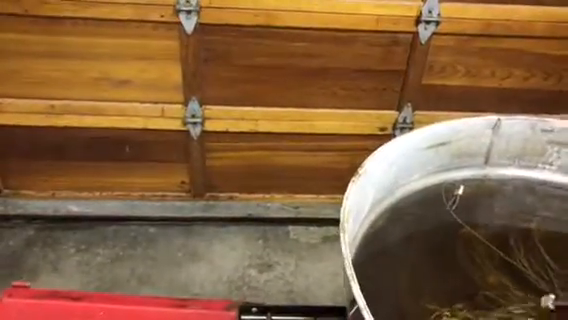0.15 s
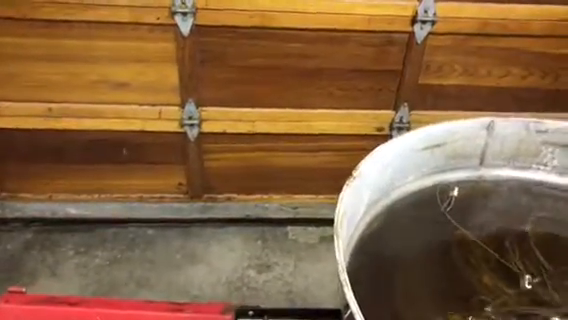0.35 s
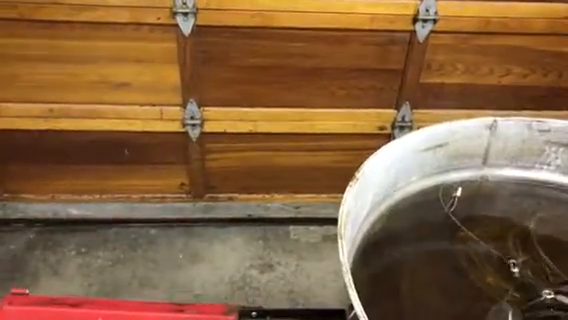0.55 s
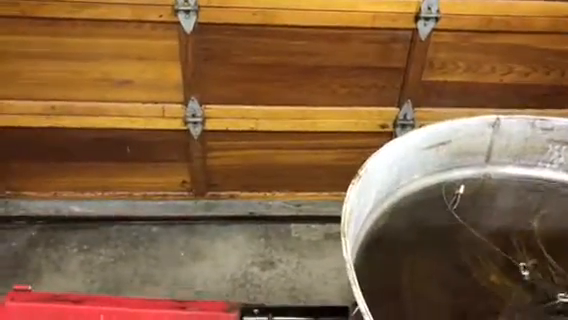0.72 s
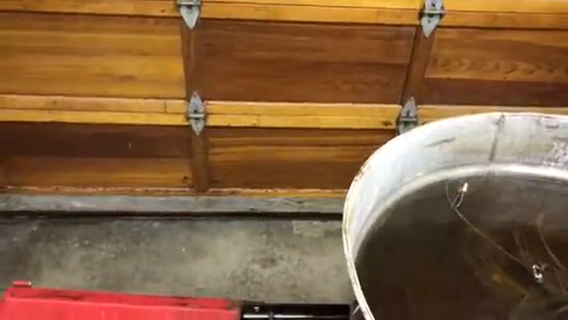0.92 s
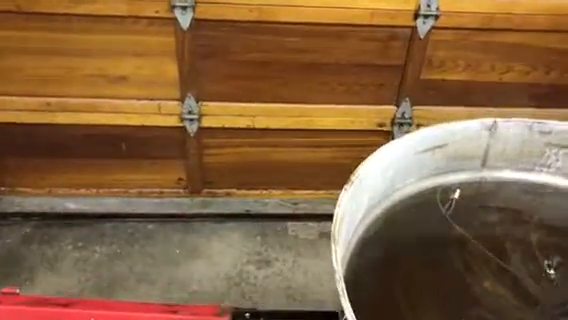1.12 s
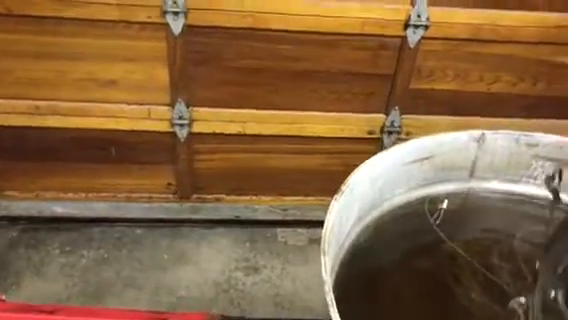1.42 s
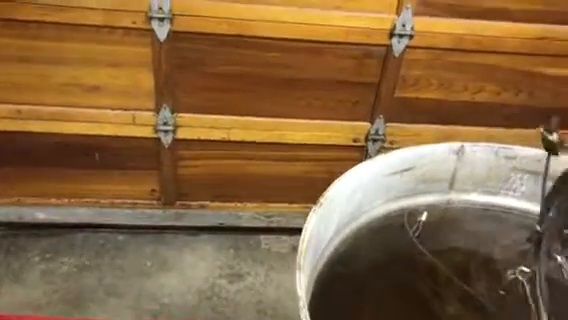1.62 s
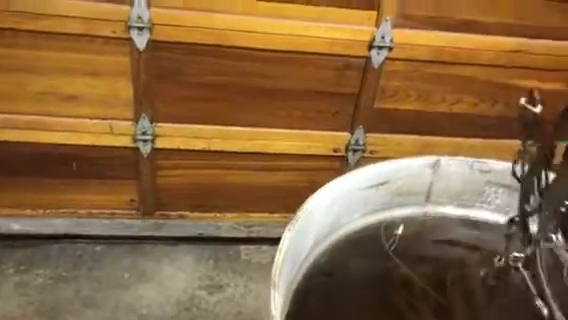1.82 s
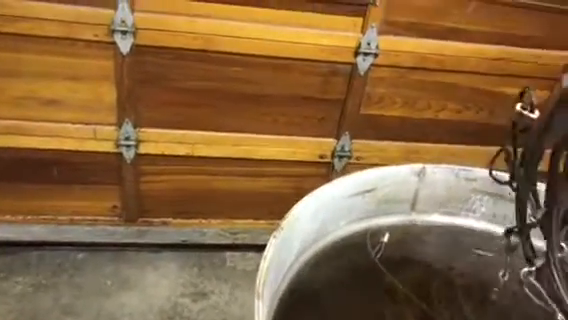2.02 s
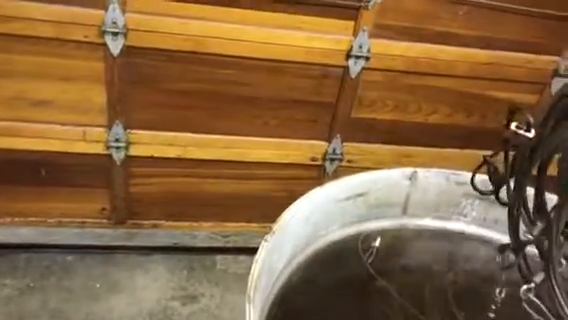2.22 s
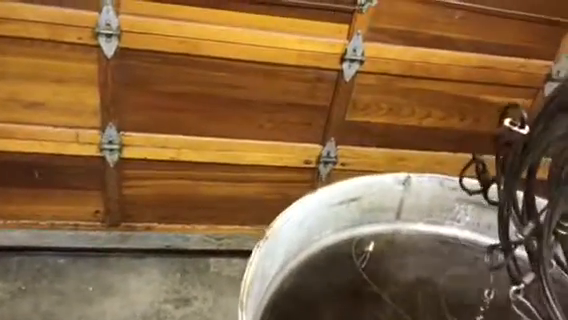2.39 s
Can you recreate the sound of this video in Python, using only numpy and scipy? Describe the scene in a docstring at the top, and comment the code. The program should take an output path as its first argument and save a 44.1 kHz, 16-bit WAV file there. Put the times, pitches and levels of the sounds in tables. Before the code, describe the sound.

Water runs off a lifted cable bundle into a metal tub of water, heard close in a garage. Quiet slosh and fine droplets open; splashes burst near 0.3, 0.4 and 0.55 s, with ringing bubble plops, fading by 0.85. A softer, lower gurgling trickle runs 1.0-1.4 s with a brief thin hiss. After a near lull, crisp irregular drips and plinks patter from 1.5 to 2.5 s over faint hum.

```python
"""A bundle of cable is drawn out of a metal tub of water in a garage. From the start: room tone, faint hum, low
slosh and fine droplets, all from shaped noise or random impulses. Water pours off in two surges, up to 0.9 s
and from 1.0 s, made of dense splashes, bubbles and tub ringing. From 0.2 s single drops tick; loud bubbles gulp
within the surges and drops trap smaller ringing ones; a thin jet hisses in the second surge. After the surges
the drops carry on. Tub echoes and a short garage tail surround the water."""
import sys
import numpy as np
from scipy import signal
from scipy.fft import rfft, irfft, next_fast_len
from scipy.io import wavfile

SR = 44100
rng = np.random.default_rng(int(sys.argv[2]) if len(sys.argv) > 2 else 0)


def file_out(sig):
    """Save sig as 16-bit WAV at sys.argv[1]."""
    # one column per channel
    cols = np.atleast_2d(sig).T
    # limit, then scale
    lim = np.clip(cols, -1, 1)
    pcm = np.round(lim * 32767).astype(np.int16)
    wavfile.write(sys.argv[1], SR, pcm)


N = 112454
TIME_S = np.arange(N) / SR
EDGE_HZ = 16050


def amp(db):
    """Decibels to gain."""
    return 10 ** (np.asarray(db) / 20)


def unit(x):
    """Scales to rms 1."""
    return x / np.sqrt(np.mean(x ** 2) + 1e-20)


def read(points, hz):
    """Reads a table on a log-frequency axis."""
    f, value = np.transpose(points)
    return np.interp(np.log(hz + 1), np.log(f + 1), value)


def envelope(points):
    """Gain over time from a (time_s, level_db) table."""
    return amp(np.interp(TIME_S, *np.transpose(points)))


def add(mix, start_s, sound):
    """Mixes a sound in at start_s."""
    part = mix[max(round(start_s * SR), 0):][:len(sound)]
    part += sound[:len(part)]


def shaped(x, gain):
    """Filters by a function of frequency."""
    size = next_fast_len(N + SR // 2)
    return irfft(rfft(x, size) * gain(np.fft.rfftfreq(size, 1 / SR)), size)[:N]


def low_part(x, top_hz, order):
    """Rolls off above top_hz without phase shift."""
    return shaped(x, lambda f: 1 / (1 + (f / top_hz) ** order))


def ring(x, hz, width_hz):
    """One resonance of gain 1 at its centre."""
    r = np.exp(-np.pi * width_hz / SR)
    pole = r * np.exp(2j * np.pi * hz / SR)
    return 2 * signal.lfilter([1 - r], [1, -pole], x).real


def impacts(per_s, spread_db):
    """A random train of impulses of unequal size and random sign."""
    size_db = spread_db * np.minimum(rng.exponential(1, N), 4)
    size = amp(size_db) * rng.choice([-1, 1], N)
    return size * (rng.random(N) < per_s / SR)


BUBBLE_ATTACK_S = 0.0001
# Most of the swing dies fast, the rest rings on; lengths are multiples of the bubble's life
FAST_LIFE, SLOW_LIFE, SLOW_SHARE = 0.62, 1.6, 0.3


def bubble(hz, life_cycles, rise_per_life):
    """A dying sine whose pitch climbs as the bubble nears the surface."""
    life_s = life_cycles / hz
    t = np.arange(0, 9 * life_s, 1 / SR)
    lives = t / life_s
    fast = (1 - SLOW_SHARE) * np.exp(-lives / FAST_LIFE)
    slow = SLOW_SHARE * np.exp(-lives / SLOW_LIFE)
    tone = np.sin(2 * np.pi * hz * t * (1 + rise_per_life * lives / 2))
    return tone * (fast + slow) * (1 - np.exp(-t / BUBBLE_ATTACK_S))


SMALL_BUBBLE_RISE_PER_LIFE = 0.043


def bubble_cloud(per_s, spread_db, low_hz, high_hz, life_cycles, tilt, count=24):
    """Small bubbles of many sizes, born at random; tilt favours the high ones."""
    cloud = np.zeros(N)
    for hz in np.geomspace(low_hz, high_hz, count):
        births = impacts(per_s / count, spread_db)
        voice = bubble(hz, life_cycles, SMALL_BUBBLE_RISE_PER_LIFE)
        cloud += signal.oaconvolve(births, voice)[:N] * (hz / low_hz) ** tilt
    return unit(cloud)


# Tub resonances before the send gain: pitch_hz, width_hz, gain_db
TUB_MODES = [(1030, 13, -37.5), (1192, 30, -12.5), (1410, 93, -2.5), (1529, 85, -2.5), (1671, 15, -0.5),
             (2266, 20, -15), (2835, 17, -22.5), (2793, 78, -3.5), (3450, 21, -9), (3563, 270, -6)]
TUB_IN_SURGE_DB, TUB_IN_DRIPS_DB = 8.5, -14


def tub(x):
    """The metal tub rings at its resonances."""
    return sum(amp(gain_db) * ring(x, hz, width_hz) for hz, width_hz, gain_db in TUB_MODES)


GRAINS_PER_S, GRAIN_SPREAD_DB = 7000, 1.5
BURBLES_PER_S, BURBLE_SPREAD_DB, BURBLE_DB = 1200, 3.5, -7.5
BURBLE_LOW_HZ, BURBLE_HIGH_HZ, BURBLE_CYCLES, BURBLE_TILT = 798.6, 6000, 6, 0.7
CHURN_TOP_HZ, SPRAY_FROM_HZ = 1944, 4100
CHURN_TRIM_DB, FINE_TRIM_DB, SPRAY_TRIM_DB = -4, 0, -5.5
SURGE_FADE_S = 0.05


def surge(levels, colour):
    """Tiny splashes, bubbles and tub knocks, split into three bands that swell independently."""
    start_to_end_s, *curves_db = np.transpose(levels)
    splashes = unit(impacts(GRAINS_PER_S, GRAIN_SPREAD_DB))
    knocks = unit(impacts(GRAINS_PER_S, GRAIN_SPREAD_DB))
    burble = amp(BURBLE_DB) * bubble_cloud(
        BURBLES_PER_S, BURBLE_SPREAD_DB, BURBLE_LOW_HZ, BURBLE_HIGH_HZ, BURBLE_CYCLES, BURBLE_TILT)
    raw = splashes + burble + amp(TUB_IN_SURGE_DB) * tub(knocks)
    water = shaped(raw, lambda f: amp(read(colour, f)))

    churn = low_part(water, CHURN_TOP_HZ, 10)
    body = low_part(water, SPRAY_FROM_HZ, 10)
    bands = (churn, body - churn, water - body)
    trims_db = (CHURN_TRIM_DB, FINE_TRIM_DB, SPRAY_TRIM_DB)
    pour = np.zeros(N)
    for band, curve_db, trim_db in zip(bands, curves_db, trims_db):
        pour += unit(band) * amp(np.interp(TIME_S, start_to_end_s, curve_db) + trim_db)

    before_s, after_s = start_to_end_s[0] - TIME_S, TIME_S - start_to_end_s[-1]
    outside_s = np.maximum(np.maximum(before_s, after_s), 0)
    return pour * np.exp(-outside_s / SURGE_FADE_S)


# Levels before trim: time_s, churn_db, fine_bubbles_db, spray_db
FIRST_SURGE_LEVELS = [(0.0, -54.5, -55, -60), (0.016, -58, -58, -86), (0.026, -60.5, -68, -67),
                      (0.09, -57.5, -55.5, -57), (0.128, -61.5, -62, -71), (0.214, -54, -55.5, -54),
                      (0.276, -41, -36.5, -36.5), (0.308, -46, -43, -44), (0.372, -49, -46, -47),
                      (0.384, -33, -40, -36), (0.428, -47, -45.5, -41.5), (0.528, -46.5, -44, -44.5),
                      (0.566, -40, -38, -35.5), (0.586, -42, -42, -49), (0.67, -55, -59, -59),
                      (0.7, -48, -55.5, -56), (0.852, -77.5, -82, -77), (0.86, -67.5, -91, -71)]
# Relative spectrum: freq_hz, gain_db
FIRST_SURGE_COLOUR = [(130, -30), (200, -28), (300, -11.5), (520, -9.5), (800, -5.5), (1020, 3.5),
                      (1350, 2.5), (1650, -1), (2000, -5.5), (2750, -6), (4770, -18), (6170, -16.5),
                      (10500, -23), (15100, -23.5), (16000, -36)]


def first_surge():
    """Water runs off the cable from the start."""
    return surge(FIRST_SURGE_LEVELS, FIRST_SURGE_COLOUR)


DROPLETS_PER_S, DROPLET_SPREAD_DB = 1000, 3
DROPLET_LOW_HZ, DROPLET_HIGH_HZ, DROPLET_CYCLES, DROPLET_TILT = 1524, 8970, 2.1, 0.33
# Level before the drip low cut: time_s, level_db
DRIZZLE_LEVELS = [(0, -68.5), (.65, -58.5), (.92, -71), (1.4, -71), (1.52, -62.5), (1.68, -67),
                  (1.9, -71.5), (2.2, -67.5), (2.45, -63), (2.55, -73)]


def drizzle():
    """Fine droplets patter as a cloud of short-lived bubbles."""
    cloud = bubble_cloud(
        DROPLETS_PER_S, DROPLET_SPREAD_DB, DROPLET_LOW_HZ, DROPLET_HIGH_HZ, DROPLET_CYCLES, DROPLET_TILT)
    return cloud * envelope(DRIZZLE_LEVELS)


SPATTERS_PER_S, SPATTER_SPREAD_DB, SPATTER_FROM_HZ = 110, 3.6, 7000
# Level before the drip low cut: time_s, level_db
SPATTER_LEVELS = [(0, -66.5), (.8, -74), (.95, -72), (1.401, -79), (1.6, -79), (1.9, -71.5), (2.2, -65.5),
                  (2.55, -71)]


def spatter():
    """Very fine, sharp ticks on the surface: sparse high-passed impulses."""
    hits = impacts(SPATTERS_PER_S, SPATTER_SPREAD_DB)
    ticks = shaped(hits, lambda f: f ** 2 / (f ** 2 + SPATTER_FROM_HZ ** 2))
    return unit(ticks) * envelope(SPATTER_LEVELS)


SLOSH_HZ, SLOSH_WIDTH_HZ = 276, 300
# Low wash: time_s, level_db
SLOSH_LEVELS = [(0, -66.5), (.25, -70), (.55, -62.5), (.85, -67), (1.0, -72.5), (1.35, -84), (1.55, -84),
                (1.8, -66.5), (1.95, -78), (2.55, -74.5)]


def slosh():
    """Water left in the tub sloshes: noise through two broad low resonances."""
    wash = ring(rng.standard_normal(N), SLOSH_HZ, 2 * SLOSH_WIDTH_HZ)
    wash = ring(wash, SLOSH_HZ, SLOSH_WIDTH_HZ)
    return unit(wash) * envelope(SLOSH_LEVELS)


AIR_DB = -65.5
# Relative air spectrum: freq_hz, gain_db
AIR_COLOUR = [(20, -10), (45, 11), (110, 8.5), (200, 0.5), (400, -2.5), (650, -5), (1000, -2.5),
              (1600, -15.5), (2800, -8), (5000, -13.5), (8000, -38), (10500, -18), (13000, -12.5),
              (16000, -12)]


def room_air():
    """Steady noise with a low rumble."""
    air = shaped(rng.standard_normal(N), lambda f: amp(read(AIR_COLOUR, f)))
    return amp(AIR_DB) * unit(air)


# Hum bands, each filtered twice: pitch_hz, width_per_pass_hz, level_db
HUM_BANDS = [(52.6, 5.4, -79.5), (97.5, 10.2, -77.5)]


def hum():
    """Faint hum: noise through narrow low resonances."""
    out = np.zeros(N)
    for hz, width_hz, level_db in HUM_BANDS:
        once = ring(rng.standard_normal(N), hz, width_hz)
        out += amp(level_db) * unit(ring(once, hz, width_hz))
    return out


TICK_DECAY_S, TICK_OCTAVES = 0.00074, 0.55


def tick(peak_db, hz):
    """A drop hits the surface: a sharp minimum-phase pulse with a little spatter."""
    t, f = np.arange(512) / SR, np.fft.rfftfreq(512, 1 / SR)
    blow = 0.14 * rng.standard_normal(len(t)) * np.exp(-t / TICK_DECAY_S)
    blow[0] = 1
    octaves_off = np.log2((f + 100) / hz)
    log_gain = -2 * np.log(1 + (octaves_off / TICK_OCTAVES / 2) ** 2)
    circle = np.concatenate([log_gain, log_gain[-2:0:-1]])
    # Hilbert transform of log gain gives the minimum phase
    response = np.exp(np.conj(signal.hilbert(circle)))[:len(f)]
    pulse = irfft(rfft(blow) * response)
    return amp(peak_db) * pulse / abs(pulse).max()


# Drops striking water, before the drip low cut: start_s, peak_db, centre_hz
DROP_TICKS = [(0.1798, -37, 4520), (0.3822, -25, 7000), (.5615, -28, 5000), (0.688, -37, 7500),
              (.7250, -30.5, 13700), (0.8577, -43.5, 6750), (0.8784, -42, 4730), (0.9913, -42.5, 6000),
              (1.0135, -35, 8150), (1.1010, -34.5, 12000), (1.2730, -39.5, 6960), (1.3445, -34.5, 4040),
              (1.4718, -53, 5560), (1.518, -52, 4400), (1.5307, -42, 7760), (1.5352, -41.5, 4660),
              (1.6065, -52, 5000), (1.6307, -33.5, 14800), (1.697, -36, 13100), (1.7155, -38, 6540),
              (1.7197, -37.5, 8450), (1.7250, -39, 7500), (1.767, -34, 7000), (1.7683, -31, 7400),
              (1.7742, -33, 5300), (1.806, -31.5, 6200), (1.8105, -45, 7500), (1.8418, -49, 2560),
              (1.9445, -39.5, 14000), (1.956, -48, 5950), (1.9599, -27.5, 6000), (1.959, -30, 14300),
              (2.0093, -41, 6100), (2.0225, -38, 3960), (2.0392, -35.5, 6100), (2.0735, -28, 6940),
              (2.0734, -21, 16100), (2.0752, -54, 6600), (2.1007, -28.5, 12600), (2.1295, -29.5, 3700),
              (2.1895, -41, 14000), (2.2038, -37.5, 5200), (2.2282, -35, 14500), (2.2356, -42, 4200),
              (2.248, -38.5, 3900), (2.2618, -29.5, 4170), (2.3105, -40, 4350), (2.358, -43, 3470),
              (2.4251, -38, 4500), (2.4457, -39, 5000), (2.456, -39, 7100), (2.501, -40, 9800),
              (2.5417, -36, 8500)]


def drop_ticks():
    """Single drops strike the surface."""
    out = np.zeros(N)
    for start_s, peak_db, hz in DROP_TICKS:
        add(out, start_s, tick(peak_db, hz))
    return out


# Ringing bubbles, before the drip low cut: loud gulps within the surges, then air trapped by single drops:
# start_s, level_db, pitch_hz, life_cycles, rise_per_life
RINGING_BUBBLES = [(0.2732, -27.5, 1690, 19, .01), (.3850, -30, 1525, 20, 0.014),
                   (.5620, -33, 2655, 24, 0.0067), (0.5628, -34.5, 1292, 18, 0.011),
                   (1.0265, -43, 1550, 5.7, 0.011), (1.0693, -32, 1640, 3.8, 0.02),
                   (1.255, -36.5, 1650, 18, 0.0078), (1.287, -36, 1547, 6.4, 0.015),
                   (.738, -36.5, 1940, 4.9, 0.033), (0.857, -45, 6740, 8.8, 0.014),
                   (1.3449, -41, 3210, 13, 0.0082), (1.4724, -43.5, 5820, 6.9, .01),
                   (1.5174, -48, 4340, 10, 0.0079), (1.606, -53.5, 3900, 5.8, 0.012),
                   (1.615, -44.5, 3900, 4.3, .01), (1.6459, -47, 3530, 6.8, 0.0083),
                   (1.646, -48, 1850, 7.7, 0.025), (1.6972, -43, 2930, 6, .01),
                   (1.7203, -36, 2370, 2.4, 0.012), (1.7235, -37, 808, 3.9, .02),
                   (1.7677, -44, 1122, 14, 0.012), (1.7682, -34.5, 2920, 2, 0.016),
                   (1.7742, -47, 5820, 11, 0.018), (1.781, -37, 1480, 3.6, 0.066),
                   (1.8063, -36, 2580, 2.1, .01), (1.807, -45, 1420, 4.5, .01),
                   (1.84, -29.5, 803, 6.5, 0.0084), (1.8418, -33.5, 1320, 1.8, 0.023),
                   (1.9508, -39.5, 1355, 5.1, 0.015), (1.9594, -33, 2880, 2.3, .01),
                   (1.9600, -40.5, 3680, 4.9, .01), (1.9915, -48, 1780, 3.6, 0.0092),
                   (2.0223, -48, 2570, 2.3, .01), (2.0386, -27.5, 3620, 3.2, 0.0055),
                   (2.0732, -36, 2940, 5, .01), (2.0732, -47, 7300, 2.8, .005),
                   (2.0834, -41.5, 1151, 12, .005), (2.1125, -47.5, 870, 16, 0.016),
                   (2.1302, -35.5, 1450, 8.5, 0.0035), (2.1400, -49, 1136, 9.4, 0.0062),
                   (2.242, -49, 2450, 7.6, 0.0061), (2.2618, -38.5, 2410, 16, 0.0076),
                   (2.2647, -33, 1826, 9.5, 0.079), (2.27, -42, 2320, 8.1, 0.16),
                   (2.2660, -44, 3060, 20, 0.017), (2.2810, -44, 1210, 3.2, 0.011),
                   (2.3105, -29.5, 3340, 3.5, 0.011), (2.3570, -33, 2310, 1.5, .01),
                   (2.3667, -49, 2920, 8.1, 0.011), (2.3711, -37.5, 2930, 5.3, 0.0042),
                   (2.3960, -50, 1410, 7.7, .06), (2.4251, -36.5, 3250, 4, .01), (2.4335, -38, 1390, 4.5, .01),
                   (2.451, -43.5, 1360, 4.9, 0.12), (2.4563, -49.5, 2220, 10.5, 0.135),
                   (2.5088, -44, 3840, 5.9, .01)]


def ringing_bubbles():
    """Bubbles ring: gulps within the surges and air trapped by drops."""
    out = np.zeros(N)
    for start_s, level_db, hz, life_cycles, rise_per_life in RINGING_BUBBLES:
        add(out, start_s, amp(level_db) * bubble(hz, life_cycles, rise_per_life))
    return out


# Levels before trim: time_s, churn_db, fine_bubbles_db, spray_db
SECOND_SURGE_LEVELS = [(1.02, -62, -93, -94), (1.028, -47, -59, -53), (1.078, -44.5, -52.5, -49),
                       (1.122, -53.5, -59.5, -63), (1.174, -49, -60, -53), (1.232, -52, -52, -61),
                       (1.26, -41.5, -53.5, -59), (1.286, -42, -43, -51), (1.352, -51.5, -56.5, -65.5),
                       (1.428, -64, -75, -76), (1.45, -88, -86, -84)]
# Relative spectrum: freq_hz, gain_db
SECOND_SURGE_COLOUR = [(150, -23), (330, -15.5), (560, -16.5), (760, -5.5), (880, -12), (1060, -1.5),
                       (1590, -2), (2050, -6.5), (2910, -9), (4860, -17), (7010, -17), (10500, -26),
                       (13600, -26), (16000, -36)]


def second_surge():
    """Water runs off the cable again."""
    return surge(SECOND_SURGE_LEVELS, SECOND_SURGE_COLOUR)


JET_S, JET_HALF_S = 1.165, 0.025  # centre, Gaussian sigma
JET_DB, JET_HZ, JET_WIDTH_HZ = -60.5, 13500, 1100


def jet():
    """A thin jet: a short, high band of impulses that swells and fades."""
    grains = impacts(GRAINS_PER_S, GRAIN_SPREAD_DB)
    hiss = shaped(grains, lambda f: 1 / (1 + ((f - JET_HZ) / JET_WIDTH_HZ) ** 2))
    swell = np.exp(-((TIME_S - JET_S) / JET_HALF_S) ** 2 / 2)
    return unit(hiss) * amp(JET_DB) * swell


BOUNCE_DB, BOUNCE_DECAY_S, BOUNCE_TOP_HZ = -6.5, 0.011, 4800


def bounces(x):
    """Dense early echoes between the tub's walls: decaying low-passed noise."""
    t = np.arange(2048) / SR
    noise = rng.standard_normal(len(t)) * np.exp(-t / BOUNCE_DECAY_S)
    echoes = signal.lfilter(*signal.butter(2, BOUNCE_TOP_HZ, fs=SR), noise)
    echoes /= np.linalg.norm(echoes)
    band_share = np.sqrt(2 * BOUNCE_TOP_HZ / SR)
    return amp(BOUNCE_DB) * signal.fftconvolve(x, echoes)[:N] * band_share


# Tub wall echoes: delay_s, gain (linear)
WALL_ECHOES = [(.0009, 0.03), (.0021, -0.28), (.0031, .16), (.0038, -0.017)]


def wall(x):
    """Single echoes off the tub wall."""
    out = np.zeros(N)
    for delay_s, gain in WALL_ECHOES:
        add(out, delay_s, gain * x)
    return out


DRIP_ROOM_DB, SURGE_ROOM_DB = -13.5, -9
BOOM_DB, BOOM_TOP_HZ = 0, 670
# Garage decay: freq_hz, t60_s
GARAGE_DECAY = [(200, 1.2), (500, 0.99), (1000, 0.36), (3000, 0.24), (8000, 0.39), (16000, 0.26)]


def garage(x):
    """A diffuse half-second noise tail whose lows last longest."""
    hz, t, z = signal.stft(rng.standard_normal(SR // 2), SR, nperseg=256)
    decay = amp(-60 * t / read(GARAGE_DECAY, hz)[:, None])
    tail = signal.istft(z * decay, SR, nperseg=256)[1]
    tail *= np.minimum(np.arange(len(tail)) / SR / 0.0025, 1)  # 2.5 ms onset
    return signal.fftconvolve(x, tail / np.linalg.norm(tail))[:N]


DRIP_LOW_CUT_HZ = 1220


def scene():
    """Surges and drips in the tub, heard in the garage, where the lows of the surges linger."""
    pour = first_surge() + second_surge() + jet()
    low_cut = signal.butter(2, DRIP_LOW_CUT_HZ, "high", fs=SR, output="sos")
    direct = signal.sosfilt(low_cut, drizzle() + spatter() + drop_ticks() + ringing_bubbles())
    drops = direct + amp(TUB_IN_DRIPS_DB) * tub(direct) + bounces(direct) + wall(direct)
    boom = amp(BOOM_DB) * low_part(pour, BOOM_TOP_HZ, 4)
    room = garage(amp(DRIP_ROOM_DB) * drops + amp(SURGE_ROOM_DB) * pour + boom)
    return (pour + drops + room + slosh() + room_air() + hum())[None]


def record(dry):
    """Band limit: a steep linear-phase low-pass at EDGE_HZ."""
    low_pass = signal.firwin(511, EDGE_HZ, window=("kaiser", 9), fs=SR)
    return signal.oaconvolve(dry, low_pass[None], "same")


dry = scene()
out = record(dry)
file_out(out)
```